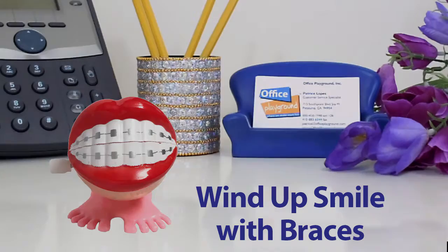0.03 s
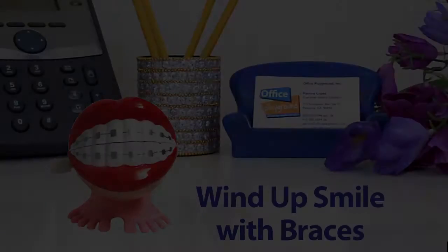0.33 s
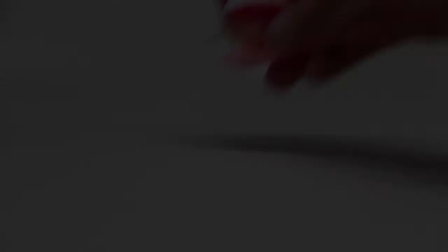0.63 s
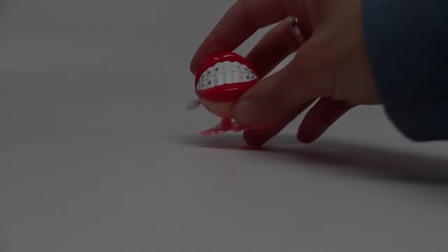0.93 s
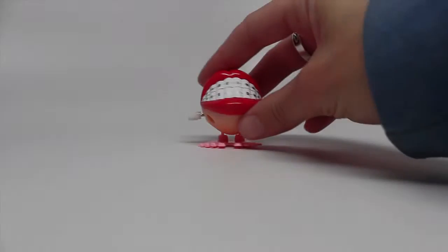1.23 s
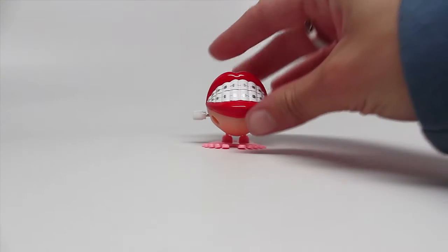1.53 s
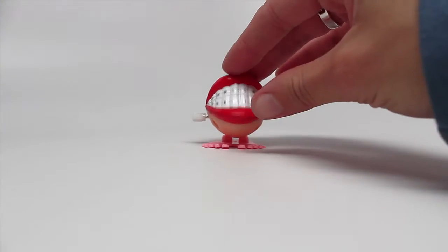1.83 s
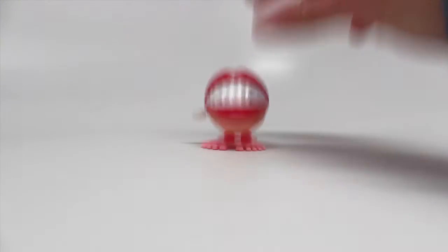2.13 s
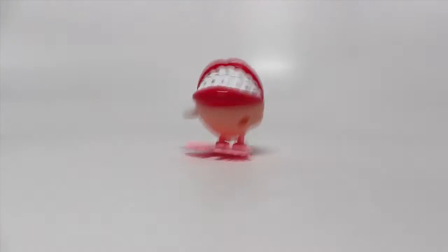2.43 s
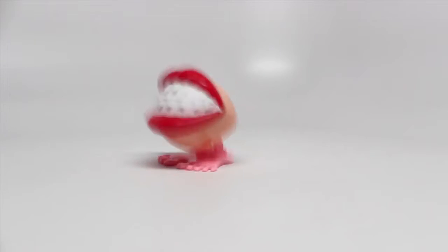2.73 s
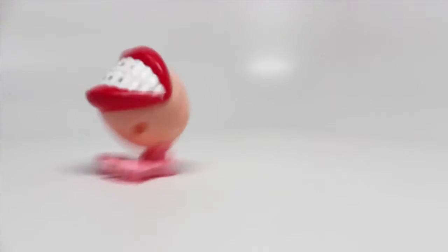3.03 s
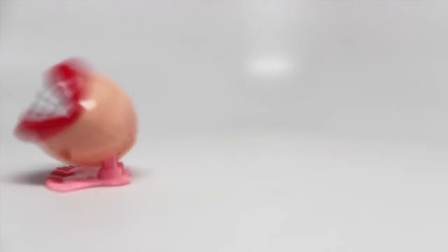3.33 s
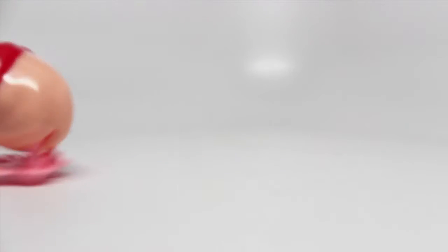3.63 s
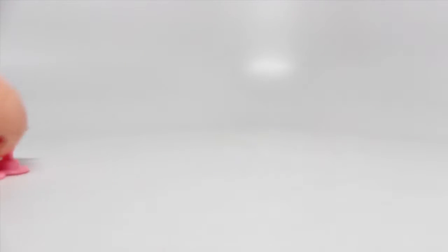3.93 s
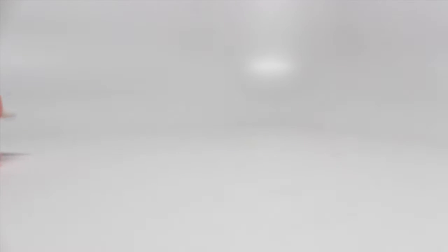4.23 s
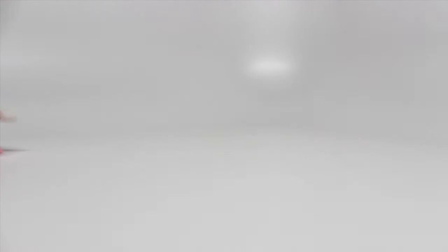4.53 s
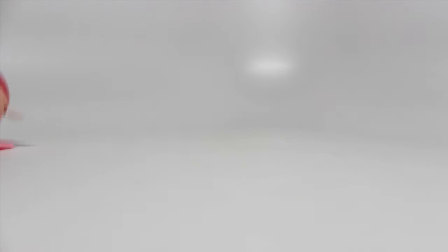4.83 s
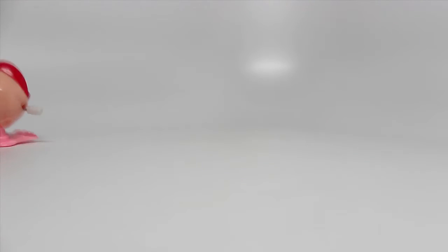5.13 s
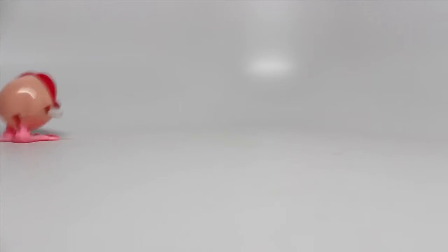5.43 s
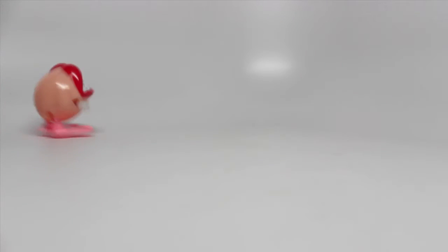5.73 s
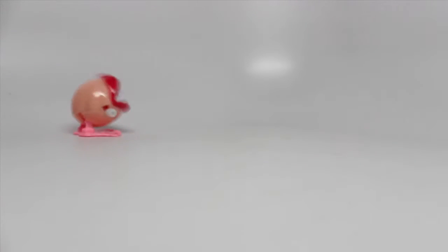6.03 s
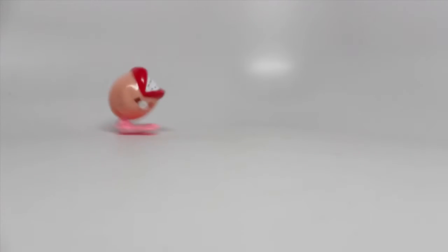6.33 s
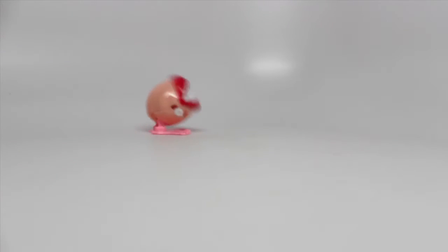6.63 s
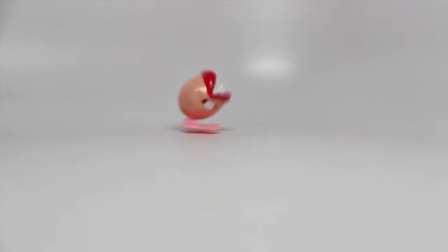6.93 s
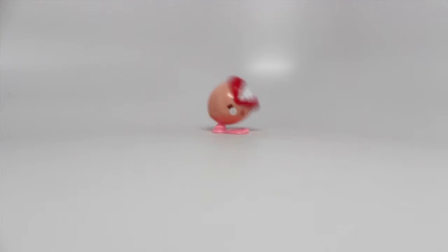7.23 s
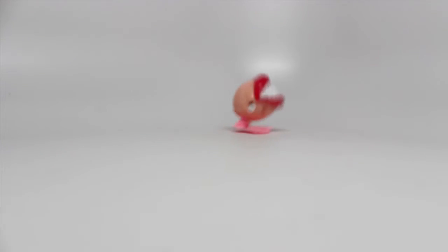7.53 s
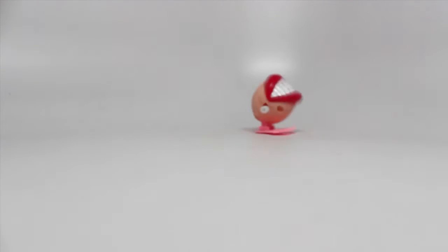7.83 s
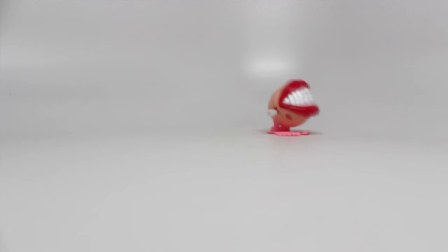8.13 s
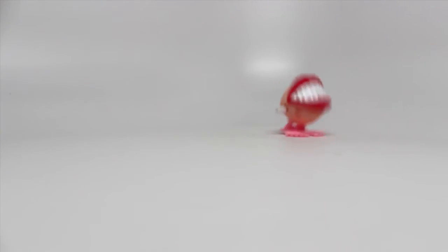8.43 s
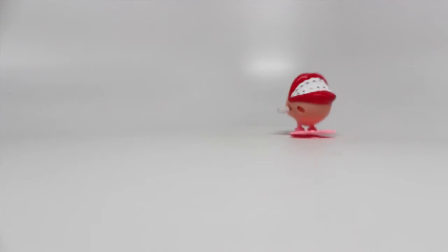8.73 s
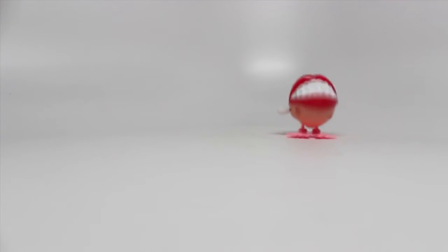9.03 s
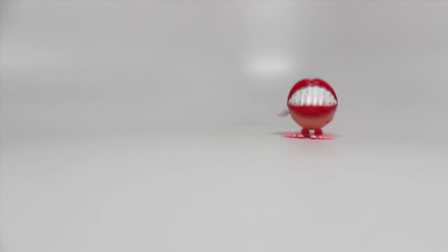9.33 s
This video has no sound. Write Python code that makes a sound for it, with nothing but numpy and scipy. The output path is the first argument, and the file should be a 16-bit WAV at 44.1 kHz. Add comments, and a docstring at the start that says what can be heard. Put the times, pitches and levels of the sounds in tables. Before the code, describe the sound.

Wind-up hopping teeth clack and click rapidly on a hard tabletop after some soft handling, in a small room.

```python
"""In a small room, a hand sets wind-up hopping teeth on a table and lets them go.
About eight times a second a cam kicks the toy off, the jaw snaps shut, and the feet land and rock.
Each impact excites damped vibrations of the plastic shell, the air in the mouth or the table top,
whose modes respond differently as the toy wanders. The hops slow as the spring runs down."""
import sys
import numpy as np
from scipy import signal
from scipy.fft import rfft, irfft
from scipy.io import wavfile

SR = 44100
rng = np.random.default_rng(int(sys.argv[2]) if len(sys.argv) > 2 else 0)


def log_audio(samples):
    """Write samples as a 16-bit WAV file to the path given in sys.argv[1]."""
    # one column per channel
    frames = np.atleast_2d(samples).T
    # limit to full scale, then quantise
    limited = np.clip(frames, -1, 1)
    pcm = np.round(limited * 32767).astype(np.int16)
    wavfile.write(sys.argv[1], SR, pcm)


N = 414540
RING = np.arange(SR // 4) / SR  # time within one impact, s


def amp(db):
    """Amplitude ratio of a level in decibels."""
    return 10 ** (np.asarray(db) / 20)


def unit(x):
    """Normalisation to unit rms."""
    return x / np.sqrt(np.mean(x ** 2) + 1e-20)


def onset_unit(x):
    """Normalisation to unit rms over the first 20 ms."""
    return x / np.sqrt(np.mean(x[:SR // 50] ** 2) + 1e-20)


def along(curve, s):
    """Linear interpolation of every column of a curve at time s."""
    times, *columns = np.transpose(curve)
    return [np.interp(s, times, column) for column in columns]


def colour(x, points, peaks=()):
    """Spectral shaping: an envelope (f/Hz, level/dB) plus resonances (f/Hz, width/Hz, level/dB)."""
    hz = np.fft.rfftfreq(len(x), 1 / SR)
    point_hz, point_db = np.transpose(points)
    envelope_db = np.interp(np.log(hz + 1), np.log(point_hz + 1), point_db)
    resonance_db = sum(db / (1 + (2 * (hz - f) / width) ** 2) for f, width, db in peaks)
    return irfft(rfft(x) * amp(envelope_db + resonance_db), len(x))


def low_cut(x, hz):
    """Fourth-order Butterworth high-pass."""
    return signal.sosfilt(signal.butter(4, hz, "highpass", fs=SR, output="sos"), x)


def add(mix, s, sound):
    """Superposition of a sound on the mix at time s."""
    part = mix[round(s * SR):][:len(sound)]
    part += sound[:len(part)]


def damping(t, t60):
    """Exponential decay, by 60 dB in t60 seconds."""
    return np.exp(-np.log(1000) * t / t60)


def ringings(count, likeness):
    """Densely overlapping modes act as noise: one row an impact, correlated with the one before."""
    noise = rng.standard_normal((count, len(RING)))
    for k in range(1, count):
        noise[k] = likeness * noise[k - 1] + np.sqrt(1 - likeness ** 2) * noise[k]
    return noise


def blow(ringing, rise, t60, crack=0, contact=0.00016):
    """Impact transient: vibration builds and decays; hard contact adds a crack. Times are in s."""
    attack = 1 - np.exp(-RING / rise)
    decay = damping(RING, t60) + crack * np.exp(-RING / contact)
    return onset_unit(ringing * attack * decay)


# background spectrum: f/Hz, level/dB
ROOM_TONE = [(20, -24), (45, 3.5), (70, -14.5), (110, 0), (215, 2), (290, -11.5), (500, -8), (700, -21),
             (2000, -23), (6000, -28), (16000, -33.5)]


def room_tone(level_db=-48):
    """Stationary noise, strongest at low frequencies."""
    return amp(level_db) * unit(colour(rng.standard_normal(N), ROOM_TONE))


# swish of the sleeve as the arm moves: t/s, level/dB
SLEEVE_LEVEL = [(.48, -52), (.55, -47), (.68, -44), (.85, -40.5), (.95, -62), (1.03, -45), (1.1, -48.5),
                (1.302, -55.5), (1.55, -63), (1.72, -69), (1.8, -49), (1.87, -58), (2.101, -82)]
# its spectrum: f/Hz, level/dB
SLEEVE_SPECTRUM = [(88, -60), (150, -30), (194, -18), (324, -7), (368, -5.5), (512, -15.5), (956, -9),
                   (1310, -17), (1780, -17), (2060, -20), (2300, -20), (2530, -25), (12000, -49),
                   (15600, -74), (22000, -120)]
# brushes and bumps of fingers and feet: t/s, level/dB, centre f/Hz, duration/s
TOUCHES = [(.655, -36, 1750, 0.067), (0.71, -41, 111, 0.076), (0.964, -34, 1300, 0.086),
           (0.992, -44, 3620, 0.058), (1.138, -42.5, 1670, 0.023), (1.139, -45, 300, 0.03),
           (1.209, -39, 322, 0.058), (1.341, -52.5, 716, 0.15), (1.781, -40.5, 274, 0.097)]


def hand(grain_db=2.0):
    """Friction noise: the sleeve swishes; fingers and feet brush the table in grainy strokes."""
    swish_db, = along(SLEEVE_LEVEL, np.arange(N) / SR)
    out = amp(swish_db) * unit(colour(rng.standard_normal(N), SLEEVE_SPECTRUM))
    for s, db, hz, duration in TOUCHES:
        noise = rng.standard_normal(len(RING))
        roughness = amp(grain_db * np.minimum(rng.exponential(1, len(RING)), 7))
        band = [(hz / 8, -38), (hz / 2, -13), (hz, 0), (hz * 2, -16), (hz * 8, -44)]
        rub = unit(colour(noise * roughness, band))
        age = 4 * RING / duration
        add(out, s, amp(db) * rub * age * np.exp(1 - age))
    return out


# resonances of the plastic shell: f/Hz, width/Hz, level/dB
SHELL_MODES = [(3030, 290, -5.5), (4830, 83, -9), (5010, 220, 3), (5790, 320, 5), (6740, 330, 7.5),
               (9190, 380, 6.5), (10130, 370, 6.5), (11500, 300, 3), (15000, 700, 10)]
# radiation towards the listener: t/s, level/dB near 3 kHz, near 5 kHz, near 12 kHz
DIRECTIVITY = [(.9, 3, 4, 7), (1.9, -1, -1, -8), (2.3, 1, -4, -1), (3.0, 12, 0.5, 4.5), (3.6, 0, -2.5, 4.5),
               (4.2, 3.5, 0, 3), (4.7, 3, 1.5, 4), (5.3, 8, -1.5, 2.5), (6.2, -2.5, -2, 2.5),
               (7.2, 1, 0.5, 3), (8.0, -2, -3, -3), (9.3, 3, -3, 1.5)]


def shell(s):
    """Directivity: the shell's resonances and the bands it beams as the toy turns, at time s."""
    low_db, middle_db, top_db = along(DIRECTIVITY, s)
    return SHELL_MODES + [(2830, 1400, low_db), (5440, 2600, middle_db), (12700, 5200, top_db)]


# spectrum of a click in the shell: f/Hz, level/dB
CLICK = [(300, -4.5), (1200, -3), (2200, 0), (3500, -3), (5500, 1.5), (8000, 0), (10000, -2), (13000, -4.5),
         (16000, -13)]
# snaps while the toy is held: t/s, click level/dB, cavity level/dB, cavity f/Hz
HELD_SNAPS = [(0.88, -23, -21, 1645), (2.073, -22, -24, 1600)]
# the jaw while hopping: t/s, delay after the kick/s, click level/dB, cavity level/dB, cavity f/Hz
JAW = [(2.25, 0.029, -26.5, -28, 1680), (2.8, .028, -28.5, -30, 1730), (3.1, 0.028, -27, -25, 1660),
       (3.75, 0.031, -27.5, -25, 1660), (4.5, 0.03, -24.5, -26.5, 1720), (4.95, .0305, -27, -35, 1740),
       (5.5, 0.029, -30.5, -32.5, 1690), (5.9, 0.029, -29, -33, 1610), (6.5, 0.03, -27.5, -25, 1660),
       (7.1, .030, -31, -34.5, 1780), (7.55, 0.031, -28, -32.5, 1630), (8.2, 0.034, -28, -34, 1605),
       (8.7, 0.03, -30.5, -32, 1580), (9.3, .030, -29, -34, 1600)]


def jaw_snaps(scatter_db=1.7):
    """Cavity resonance: the teeth meet with a click, and the air in the mouth rings briefly."""
    # the jaw snaps about 30 ms after each kick; after the first, with the toy still held, it snaps later
    kicked = np.transpose(HOPS)[0][1:]
    delays, clicks, cavities, pitches = along(JAW, kicked)
    scatter = scatter_db * rng.standard_normal(len(kicked))
    snaps = HELD_SNAPS + list(zip(kicked + delays, clicks + scatter, cavities + scatter, pitches))
    out = np.zeros(N)
    for (s, click_db, cavity_db, hz), noise in zip(snaps, ringings(len(snaps), likeness=0.66)):
        teeth = colour(noise, CLICK, shell(s) + [(4300, 2500, 4)])
        click = blow(teeth, rise=0.001, t60=0.026)
        cavity = blow(np.sin(2 * np.pi * hz * RING), rise=0.0017, t60=0.017)
        add(out, s, amp(click_db) * click + amp(cavity_db) * cavity)
    return out


# reverberation by band: f/Hz, level/dB, t60/s
ROOM_BANDS = [(110, -6.5, 0.41), (302, -4.5, 0.62), (600, -5, 0.5), (1460, -11.5, 0.81),
              (2980, -10.5, 0.33), (6500, -14.5, 0.26), (9800, -15, .24), (15000, -34, .16)]


def room_response(build_up_s=0.0029):
    """Diffuse field: reflections build up, then each band decays at its own rate."""
    t = np.arange(SR // 2) / SR
    spectrum = rfft(rng.standard_normal(len(t)))
    log_hz = np.log(np.fft.rfftfreq(len(t), 1 / SR) + 1)
    log_centres = np.log(np.transpose(ROOM_BANDS)[0] + 1)
    build_up = 1 - np.exp(-(t / build_up_s) ** 2)
    tail = np.zeros(len(t))
    for share, (_, db, t60) in zip(np.eye(len(ROOM_BANDS)), ROOM_BANDS):
        band = irfft(spectrum * np.interp(log_hz, log_centres, share), len(t))
        envelope = build_up * damping(t, t60)
        tail += amp(db) * band * envelope / np.linalg.norm(envelope)
    return tail


def reverberation(x, places=6):
    """Reflections depend on source position: equal-power fades join responses along the toy's path."""
    position = np.linspace(0, places - 1, N)
    weights = (np.sqrt(np.clip(1 - abs(position - k), 0, 1)) for k in range(places))
    return sum(signal.oaconvolve(x * weight, room_response())[:N] for weight in weights)


# one row a hop: kick t/s, kick level/dB, landing t/s, landing level/dB
HOPS = [(1.8953, -20.5, 2.1092, -17.5), (2.16, -20.5, 2.2322, -16), (2.285, -23, 2.3602, -17),
        (2.4081, -24, 2.4838, -15.5), (2.5314, -26, 2.6066, -16), (2.6513, -25.5, 2.7282, -17.5),
        (2.772, -28.5, 2.8473, -17), (2.895, -29, 2.9692, -18), (3.0169, -25.5, 3.0935, -18),
        (3.1378, -25.5, 3.2089, -18), (3.2648, -24.5, 3.3381, -17), (3.3868, -25, 3.4622, -18),
        (3.5059, -25.5, 3.5777, -18), (3.6308, -24, 3.7047, -18), (3.749, -24.5, 3.824, -18),
        (3.8688, -24, 3.9417, -16), (3.9925, -24, 4.0639, -16.0), (4.1173, -24, 4.1892, -15.5),
        (4.2427, -22.5, 4.3156, -15.5), (4.3663, -25, 4.4377, -18.5), (4.492, -23.5, 4.5653, -18.5),
        (4.6136, -26.5, 4.6868, -17), (4.736, -25.5, 4.8092, -16), (4.8606, -24.0, 4.9328, -18.0),
        (4.9846, -27.5, 5.0572, -14.5), (5.109, -25.5, 5.1816, -15), (5.232, -25.5, 5.3064, -16),
        (5.3546, -26, 5.4273, -17), (5.477, -30, 5.55, -18), (5.6, -29, 5.6738, -17),
        (5.7247, -27, 5.7983, -15.5), (5.8441, -25.5, 5.9185, -17.0), (5.9669, -29, 6.041, -16.5),
        (6.0873, -29, 6.1607, -16), (6.208, -28.0, 6.2814, -15), (6.329, -26.5, 6.403, -16),
        (6.4538, -27, 6.5272, -13.5), (6.577, -26.5, 6.6506, -15.5), (6.7004, -25, 6.7717, -15.5),
        (6.8227, -28.5, 6.8925, -16.5), (6.9432, -28.5, 7.0168, -16), (7.065, -29.5, 7.138, -15.5),
        (7.1854, -29, 7.2572, -15.5), (7.3076, -26.5, 7.3784, -15.0), (7.429, -27.5, 7.4995, -15.5),
        (7.5544, -27.5, 7.626, -15.5), (7.6811, -27, 7.7523, -13), (7.8083, -27.5, 7.877, -13.5),
        (7.936, -26.5, 8.0054, -14.0), (8.0646, -27.0, 8.1345, -12.5), (8.1943, -29, 8.2632, -13.5),
        (8.327, -31.5, 8.3927, -14.5), (8.4582, -27.5, 8.5221, -14), (8.5906, -29.5, 8.6571, -15),
        (8.723, -31.5, 8.7868, -14), (8.859, -29.5, 8.9218, -15.5), (8.9987, -30.5, 9.0588, -15.0),
        (9.1329, -30, 9.1938, -15), (9.2687, -27.5, 9.3301, -15)]
# grip of the feet on the table: t/s, rebound level/dB, knock level/dB, push level/dB
FOOTING = [(1.9, -45, -18, -44), (2.2, -14, -21.5, -24.5), (2.8, -26, -23.5, -25), (3.25, -14, -21, -29),
           (3.85, -31, -31.5, -26), (4.5, -17, -26, -24.5), (4.8, -19.5, -25, -20.5),
           (5.3, -25.5, -20.5, -26), (5.6, -30, -28, -27), (6.35, -21, -23.5, -32.5), (6.8, -20, -30, -45),
           (7.2, -20.5, -27.5, -25.5), (7.95, -24.5, -19.5, -23), (8.3, -23.5, -20, -23.5),
           (9.3, -27, -18, -23.5)]
# spectra of the table's thud and the feet's clack: f/Hz, level/dB
THUD = [(40, -46), (100, -20), (160, -4), (250, 4), (400, -1), (600, 3.5), (850, -5.5), (1300, -18.5),
        (3000, -69)]
CLACK = [(250, -49), (600, -26.5), (900, -0.5), (1300, 1), (1700, 1.5), (2100, -8), (2800, -20.5),
         (5000, -42)]
# local cutoff below which the table responds only in its few low modes: t/s, f/Hz
THUD_CUTOFF = [(2.2, 159), (3.5, 144), (4.6, 180), (5.7, 155), (7.5, 160), (8.3, 204), (9.3, 226)]


def cam_kicks(scatter_db=4):
    """Action and reaction: the cam drops with a click, and the feet knock and push off the table."""
    out = np.zeros(N)
    for (s, click_db, _, _), noise in zip(HOPS, ringings(len(HOPS), likeness=0.67)):
        knock_db, push_db = along(FOOTING, s)[1:] + scatter_db * rng.standard_normal(2)
        click = blow(colour(noise, CLICK, shell(s)), rise=0.00048, t60=0.03, crack=0.6, contact=0.0023)
        knock = blow(colour(noise, CLACK), rise=0.0014, t60=0.087)
        push = blow(colour(noise, THUD), rise=0.002, t60=0.16)
        push = low_cut(push, *along(THUD_CUTOFF, s))
        add(out, s, amp(click_db) * click + amp(knock_db - 4) * knock + amp(push_db - 5) * push)
    return out


# modes of the table top: f/Hz, level/dB, t60/s, antinode crossing t/s, time spent near it/s
TABLE_MODES = [(113, -9.5, 0.15, 3.6, 1.2), (124.2, -12.5, 0.53, 6.1, 1.4), (157.3, -7, 0.4, 6.1, 0.51),
               (175, -5.5, 0.57, 6.1, 0.26), (177.4, -10, 0.39, 2.87, 0.97), (224, 1, 0.14, 6.6, 0.79),
               (250, 7.5, 0.14, 5.74, 0.39), (246.5, -1, 0.12, 9.3, 1.4), (279, -1, 0.49, 8.9, 0.91),
               (325.8, -2.5, 0.53, 8.1, 0.61), (320.2, 1, 0.6, 3.6, 0.31), (360.5, -2, 0.37, 8.5, 1.2),
               (379.6, 0.5, 0.64, 1.63, 1.3), (429, -5.5, 0.75, 3.9, 1.1), (500.4, 3.5, 0.48, 5.57, 0.19),
               (485, -15, 0.12, 8.9, 0.87), (544, 0.5, 0.25, 8.1, 0.61), (624, -13, 0.25, 9.1, 1.6),
               (658, -10, 0.86, 6.6, 1.4), (765, 3.5, 0.22, 4.17, 0.58), (1033, 4, 0.23, 9.4, 1.4),
               (1144, -18, 0.49, 2.9, 1.4), (1244, -13.5, 0.11, 6.5, 0.36), (1280, -35, 0.29, 9.0, 1.1),
               (1490, 13.5, 0.11, 11.3, 0.67), (1620, -16, 0.12, 14, 0.53)]


def table_ring(s, signs, away_db=-10, scatter_db=1.0, detune=0.005):
    """Modal superposition: each mode is excited most when the toy lands on its antinode."""
    hz, db, t60, crossing, stay = np.transpose(TABLE_MODES)[:, :, None]
    nearness = np.exp(-0.5 * ((s - crossing) / stay) ** 2)
    gain = signs * amp(db + away_db * (1 - nearness) + scatter_db * rng.standard_normal(hz.shape))
    detuned_hz = hz * (1 + detune * rng.standard_normal(hz.shape))
    modes = np.sin(2 * np.pi * detuned_hz * RING) * damping(RING, t60)
    return np.sqrt(2) * (gain * modes).sum(0) / np.linalg.norm(gain)


# spectrum of the contact tick: f/Hz, level/dB
TICK = [(900, -65), (1800, 6.5), (2400, 2.5), (3300, 0.5), (4500, -4.5), (6300, -6.5), (9000, -18),
        (16000, -18.5)]
# the first kick, toy still pressed down:
# t/s, thud level/dB, thud f/Hz, clack level/dB, clack f/Hz, tick level/dB
STAMP = [(1.8965, -24, 385, -20, 1300, -33)]


def foot_impacts(rows, ring_db):
    """Impulsive excitation: the contact ticks, the hard feet clack, the table thuds and rings."""
    signs = rng.choice([-1, 1], (len(TABLE_MODES), 1))
    noises = ringings(len(rows), likeness=0.82)  # the toy moves little in one hop
    out = np.zeros(N)
    for (s, thud_db, thud_hz, clack_db, clack_hz, tick_db), noise in zip(rows, noises):
        top = colour(noise, THUD, [(thud_hz, thud_hz * 0.35, 6)])
        thud = blow(top, rise=0.00044, t60=0.11, crack=0.59, contact=0.0019)
        feet = colour(noise, CLACK, [(clack_hz, 420, 6)])
        sound = amp(thud_db - 1.5) * onset_unit(low_cut(thud, *along(THUD_CUTOFF, s)))
        sound += amp(thud_db + ring_db) * table_ring(s, signs)
        sound += amp(clack_db - 3) * blow(feet, rise=0.00016, t60=0.088, crack=0.48)
        sound += amp(tick_db - 1) * blow(colour(noise, TICK), rise=0.0001, t60=0.04, crack=1.0)
        add(out, s, sound)
    return out


# timbre along the path: t/s, thud f/Hz, relative clack level/dB, clack f/Hz, relative tick level/dB
LANDING_TIMBRE = [(2.1, 317, -1.5, 1250, -10.5), (2.8, 566, 0, 1280, -9), (3.05, 533, -2, 1380, -6.5),
                  (3.4, 480, 1, 1340, -8), (3.7, 312, 2, 1460, -9), (4.25, 510, -7.5, 950, -8.5),
                  (4.65, 265, -1.5, 1160, -6), (5.05, 247, -4, 1280, -11), (5.5, 240, 1.5, 1170, -10),
                  (6.05, 250, -3.5, 1500, -10), (6.55, 274, -3, 1320, -13.5), (6.8, 350, 1.5, 1200, -9),
                  (7.15, 560, 1.5, 1320, -11.5), (7.6, 350, -2.5, 1480, -10), (8.25, 290, -2.5, 1410, -14),
                  (8.55, 274, -2, 1340, -14.5), (9.35, 274, 0, 1410, -16)]


def landings():
    """Driving-point response: the hop sets a landing's strength, the place on the table its timbre."""
    _, _, s, db = np.transpose(HOPS)
    thud_hz, clack_db, clack_hz, tick_db = along(LANDING_TIMBRE, s)
    rows = np.transpose([s, db, thud_hz, db + clack_db, clack_hz, db + tick_db])
    return foot_impacts(rows, ring_db=-3.5)


# spectrum of a rebound: f/Hz, level/dB
REBOUND = [(200, 0.5), (700, 11.5), (1500, 5), (2500, 0), (4000, -16), (8000, -31), (16000, -43)]


def rebounds(stay_share=0.58, jitter_s=0.0044, scatter_db=4):
    """Secondary impacts: the toy rocks on its feet after landing, with one knock and two lighter ones."""
    kicked, _, landed, _ = np.transpose(HOPS)
    stays = np.interp(landed, landed[:-1], kicked[1:] - landed[:-1])
    times = landed + stay_share * stays + jitter_s * rng.standard_normal(len(HOPS))
    out = np.zeros(N)
    for s, noise in zip(times, ringings(len(times), likeness=0.11)):
        db = along(FOOTING, s)[0] + scatter_db * rng.standard_normal()
        knock = colour(noise, REBOUND)
        add(out, s, amp(db - 6) * blow(knock, rise=0.00013, t60=0.097))
        for shift_s in rng.uniform(-0.014, 0.016, size=2):
            chatter = np.roll(knock, rng.integers(SR))
            add(out, s + shift_s, amp(db - 13) * blow(chatter, rise=0.00067, t60=0.026))
    return out


def scene():
    """Superposition of the toy, its reverberation, the hand and the room tone."""
    feet = landings() + foot_impacts(STAMP, ring_db=-5.5) + rebounds()
    toy = low_cut(feet + cam_kicks() + jaw_snaps(), hz=85)  # little radiates below the lowest mode
    background = room_tone()
    return (toy + reverberation(toy) + hand() + background)[None]


def record(dry, start_s=0.48, fade_s=0.0064, edge_hz=16000):
    """Gating, soft saturation and band limiting: silence at first, then sound with rounded peaks."""
    opened = dry * np.clip((np.arange(N) / SR - start_s) / fade_s, 0, 1)
    rounded = opened / (1 + opened ** 4) ** (1 / 4)
    low_pass = signal.firwin(255, edge_hz, window=("kaiser", 8), fs=SR)
    return signal.oaconvolve(rounded, low_pass[None], "same")


dry = scene()
out = record(dry)
log_audio(out)
```